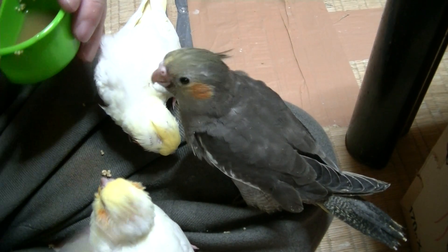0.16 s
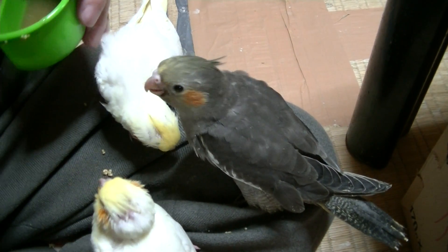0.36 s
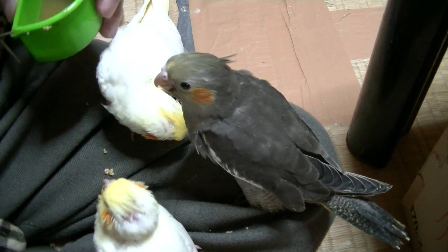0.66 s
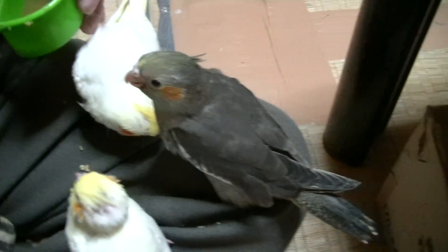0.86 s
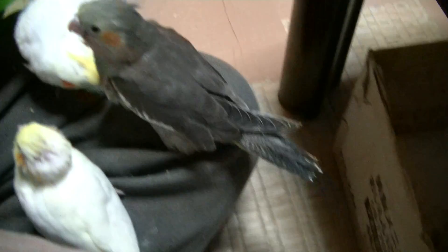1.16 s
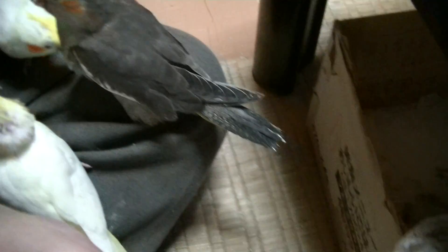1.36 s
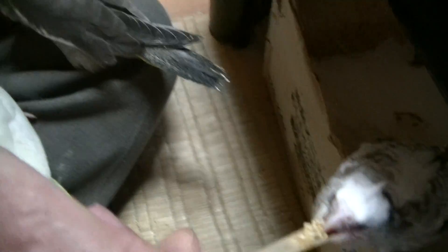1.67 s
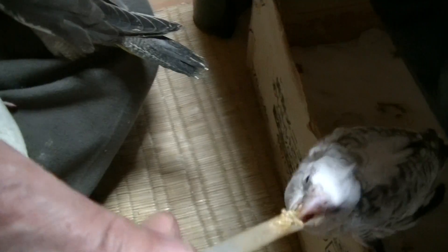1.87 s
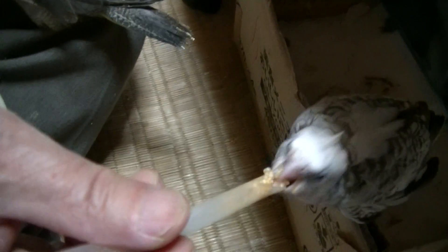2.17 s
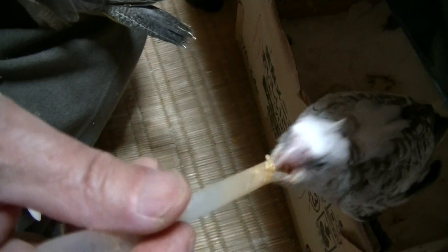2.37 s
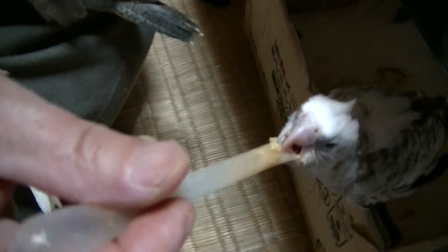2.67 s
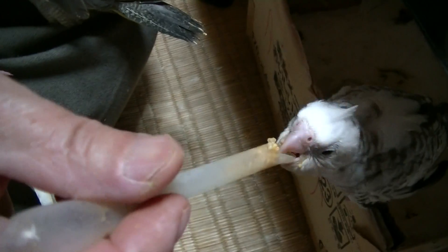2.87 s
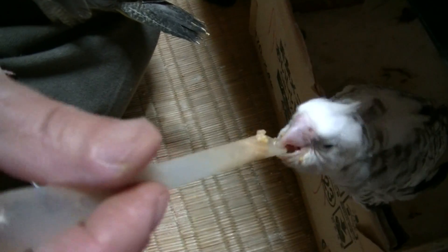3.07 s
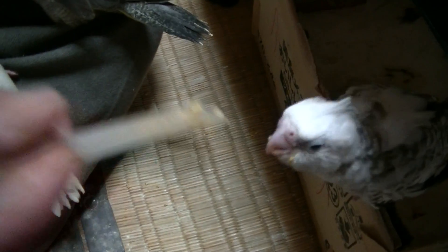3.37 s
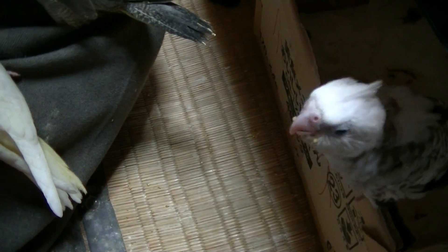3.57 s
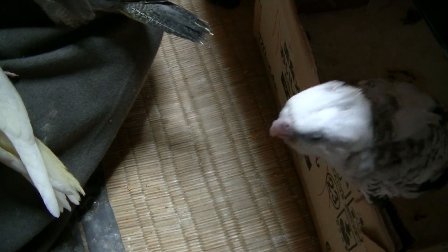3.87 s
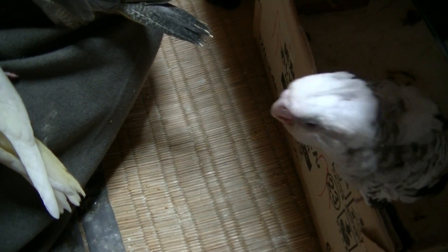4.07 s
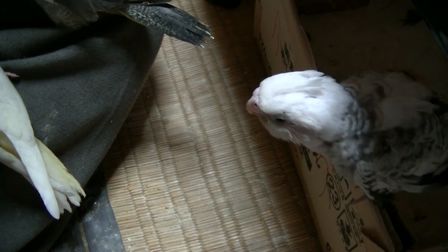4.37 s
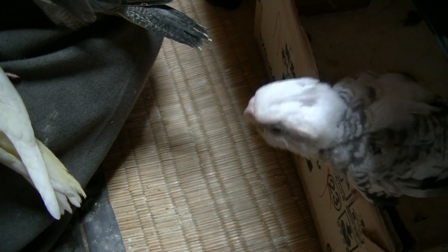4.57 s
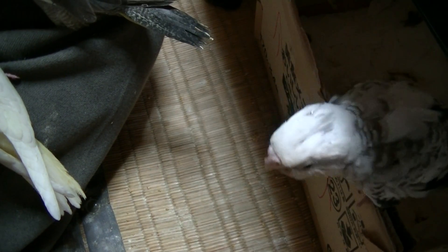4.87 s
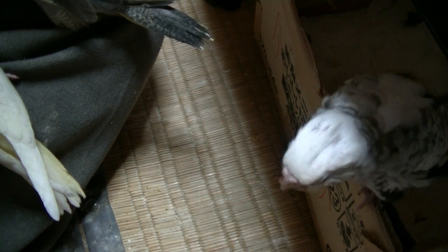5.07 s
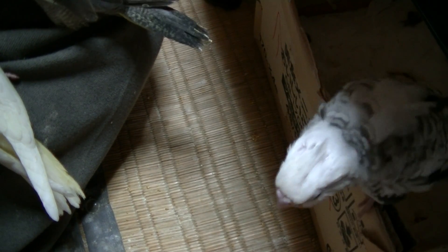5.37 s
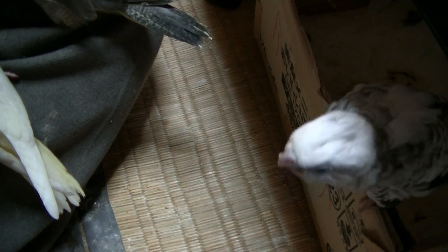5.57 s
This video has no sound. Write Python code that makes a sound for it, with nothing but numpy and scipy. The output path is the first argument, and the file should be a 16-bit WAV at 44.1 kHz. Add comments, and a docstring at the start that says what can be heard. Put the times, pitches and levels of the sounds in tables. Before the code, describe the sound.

Several parrot chicks are heard close up in a small, slightly echoing room with very faint air noise and mains hum. From the start, raspy, breathy hisses overlap with little squeaks and chirps; a long, full, tearing begging call runs from about 0.5 to 1.7 s, its treble shifting as the beak opens. Sharper short hisses follow at 1.8 and 2.0 s among bright chirps. From 2.1 to 4.2 s hissing stops: cardboard bumps sound at about 2.26, 2.5 and 2.8 s, with two fainter knocks near 3.7 and 3.8, tiny squeaks, distant chirps and fine wet crackling. Distinct beak clicks come at 2.9, 3.9 and a close pair at 4.1 s. Thin hisses return at 4.2 s, then a brief hoarse, shrill squeal at 4.57 s that clears as it fades. Softer hisses and small chirps continue to the end, with a barely audible low drone from about 4.6 to 5.8 s.

```python
"""Rasping hisses mixed with chirps and squeaks, a quieter stretch of chirps and clicks, then more hisses:
parrot chicks beg while they are hand-fed in a small room. Hisses are noise through moving throat and beak
resonances; chirps, squeaks and one shrill squeal are unsteady harmonic tones. Beaks click in wet food
(short noisy rings) and a cardboard box is bumped (decaying filtered noise). Under it lie faint coloured
room noise, mains hum and a late low drone."""
import sys
import numpy as np
from scipy import signal
from scipy.fft import rfft, irfft, next_fast_len
from scipy.io import wavfile
from scipy.ndimage import map_coordinates

SR = 44100
rng = np.random.default_rng(int(sys.argv[2]) if len(sys.argv) > 2 else 0)


def persist_wave(psi):
    """Save psi, clipped to +-1, as 16-bit WAV."""
    counts = np.round(np.clip(psi, -1, 1) * 32767).astype(np.int16)
    wavfile.write(sys.argv[1], SR, np.atleast_2d(counts).T)


N = 252693
T = np.arange(N) / SR  # s


def amp(db):
    """Decibels to gain."""
    return 10 ** (np.asarray(db) / 20)


def unit(x):
    """Scale to rms 1."""
    return x / np.sqrt(np.mean(x ** 2) + 1e-20)


def along(points, hz):
    """Read (f/Hz, value) points on a log frequency axis."""
    f, v = np.transpose(points)
    return np.interp(np.log(hz + 1), np.log(f + 1), v)


def curves(rows):
    """One value per sample for each column after the time."""
    t_s, *columns = np.transpose(rows)
    return [np.interp(T, t_s, column) for column in columns]


def gate(rows, fade_s=0.011):
    """Open from the first row's time to the last one's."""
    inside_s = np.minimum(T - rows[0][0], rows[-1][0] - T)
    return np.sqrt(np.clip(inside_s / fade_s + .5, 0, 1))


def wobble(rate_hz, size=N):
    """Smooth random curve with rate_hz knots a second."""
    knots = rng.standard_normal(int(size * rate_hz / SR) + 4)
    return map_coordinates(knots, [np.arange(size) * rate_hz / SR])


def filtered(x, response):
    """Apply a response given as a function of frequency."""
    m = next_fast_len(N + SR // 2)
    return irfft(rfft(x, m) * response(np.fft.rfftfreq(m, 1 / SR)), m)[..., :N]


def humps(modes, hz):
    """Gain of resonances (or notches) on a flat spectrum."""
    gain_db = sum(db / (1 + (2 * (hz - centre) / width) ** 2) for centre, width, db in modes)
    return amp(gain_db)


# left-right likeness at the two ports: f/Hz, likeness (0-1)
PORT_LIKENESS = [(30, .7), (150, .92), (1300, .97), (4000, .89), (9000, .45)]


def ports(pair):
    """Two unrelated signals as heard at close ports: most alike in the low mids, least in the treble."""
    turn_rad = lambda hz: np.arccos(np.clip(along(PORT_LIKENESS, hz), 0, 1)) / 2
    mid, side = filtered(pair, lambda hz: [np.cos(turn_rad(hz)), np.sin(turn_rad(hz))])
    return np.array([mid + side, mid - side])


def noise(colour):
    """Coloured stereo noise of rms 1."""
    return unit(ports(filtered(rng.standard_normal((2, N)), colour)))


def add(track, t_s, sound):
    """Mix a sound into a track at t_s."""
    part = track[max(round(t_s * SR), 0):][:len(sound)]
    part += sound[:len(part)]


# reverberation time of the small room: f/Hz, t60/s
ROOM_T60 = [(3000, 0.33), (12000, 0.092)]


def room(x, walls_db=-16, tail_db=-17):
    """Near surfaces echo within milliseconds, then the small room dies away."""
    hz, t_s, z = signal.stft(rng.standard_normal((2, SR // 3)), SR, nperseg=256)
    decay_db = -60 * t_s / along(ROOM_T60, hz)[:, None]
    tail = signal.istft(z * amp(decay_db), SR, nperseg=256)[1]
    response = amp(tail_db) * tail / np.linalg.norm(tail[0])
    delays = rng.integers(SR // 1000, SR // 120, (2, 8))  # samples, 8 echoes a side
    response[[[0], [1]], delays] += amp(walls_db) / np.sqrt(8)
    wet = signal.fftconvolve(x.mean(axis=0)[None], response, axes=1)[:, :N]
    return x + ports(wet)


# room air spectrum: f/Hz, level/dB
AIR_SPECTRUM = [(30, -27), (70, -16), (130, -6.5), (550, -8.5), (1100, -15), (2500, -17), (7000, -28),
                (15500, -32)]
# low drone: t/s, length/s, rms level/dB
DRONE_SPELLS = [(4.6, 1.25, -67)]
DRONE_HZ = 62.7
HUM_HZ, HUM_RMS_DB = 120.7, -63.5


def background(air_db=-51.5, fade_s=0.2):
    """Still room air as coloured noise; slightly unsteady mains hum and a low drone as sines."""
    air = amp(air_db) * noise(lambda hz: amp(along(AIR_SPECTRUM, hz)))
    hum = amp(HUM_RMS_DB + wobble(1.75)) * np.sin(2 * np.pi * HUM_HZ * T)
    running = sum(amp(db) * gate([[t_s], [t_s + length_s]], fade_s) for t_s, length_s, db in DRONE_SPELLS)
    drone = running * np.sin(2 * np.pi * DRONE_HZ * T)
    return air + np.sqrt(2) * (hum + drone)  # rms to peak


# bumps on the box: t/s, level/dB, low limit f/Hz, high limit f/Hz, t60/s
BUMPS = [(2.262, -14, 322, 1120, 0.22), (2.506, -16, 223, 3060, 0.21), (2.775, -17.5, 181, 348, 0.17),
         (3.704, -31.5, 300, 3230, 0.16), (3.816, -28, 860, 5950, 0.023)]
# cardboard modes: f/Hz, width/Hz, level/dB
BOX_MODES = [(150, 37, 22), (223, 19.5, 15.5), (357, 60, 9), (562, 120, 8)]


def bumps(attack_s=0.0032):
    """Dense cardboard modes die fast; each bump has its own limits, from dull thump to bright knock."""
    out = np.zeros((2, N))
    cardboard = lambda hz: humps(BOX_MODES, hz) / (1 + (hz / 8000) ** 4)
    for t_s, db, low_hz, high_hz, t60_s in BUMPS:
        highpass = lambda hz: (hz / low_hz) ** 6 / (1 + (hz / low_hz) ** 6)
        contact = lambda hz: highpass(hz) / np.sqrt(1 + (hz / high_hz) ** 4)
        age_s = np.maximum(T - t_s, 0)
        envelope = amp(db - 60 * age_s / t60_s) * (1 - np.exp(-age_s / attack_s))
        out += envelope * noise(lambda hz: contact(hz) * cardboard(hz))
    return out


# wet crackle of beaks in food, before random spread: t/s, level/dB
CRACKLE = [(2.1, -46.5), (3.6, -60.5), (4.05, -46), (5.7, -51.5)]
# distinct beak clicks: t/s, level/dB
CLICKS = [(2.875, -34.5), (3.887, -40), (4.087, -32), (4.107, -33)]


def nibbles(rate_hz=150, spread_db=4.0):
    """Beaks smack in soft food: distinct clicks over a fine crackle, each a noisy ring at its own pitch."""
    out = np.zeros(N)
    ring_s = np.arange(SR // 200) / SR
    start_s, end_s = CRACKLE[0][0], CRACKLE[-1][0]
    when, size = rng.random((int(rate_hz * (end_s - start_s)), 2)).T
    times_s = start_s + when * (end_s - start_s)
    levels_db = np.interp(times_s, *np.transpose(CRACKLE)) - spread_db * np.log(size + 0.28)
    for t_s, db in CLICKS + list(zip(times_s, levels_db)):
        pitch_hz = 1700 * 5 ** rng.random()
        ring = np.sin(2 * np.pi * pitch_hz * ring_s) + rng.standard_normal(len(ring_s))
        add(out, t_s, amp(db - 60 * ring_s / 0.02) * ring)
    return filtered(out, lambda hz: 1 / (1 + 1j * hz / 7000))


def whistle(pitch_hz, rough, partials):
    """A syrinx tone; roughness shakes its pitch and its size."""
    size = len(pitch_hz)
    shaken_hz = pitch_hz * (1 + 0.0783 * rough * wobble(1300, size))
    phase = 2 * np.pi * np.cumsum(shaken_hz) / SR
    tone = sum(amp(db) * np.sin(k * phase) for k, db in partials)
    return unit(tone * amp(2.0 * rough * wobble(570, size)))


def overtones(db, pure_db=1.9):
    """(multiple, dB) of a whistle: the louder, the purer."""
    drop_db = 11.0 + pure_db * max(db + 36.0, 0)
    return [(k, (1 - k) * drop_db) for k in range(1, 4)]


# tiny squeaks between gulps: t/s, peak level/dB, f/Hz
SQUEAKS = [(0.164, -11.5, 1950), (0.329, -15.5, 1890), (1.753, -21.5, 2800), (2.2313, -28, 3380),
           (2.391, -27, 3650), (2.8493, -31, 3380), (2.984, -26.5, 3430), (3.0003, -26.5, 3500),
           (3.08, -34, 2940), (3.099, -30.5, 3430), (3.2397, -25.5, 3590), (3.361, -31, 3220),
           (3.3862, -32, 3110), (3.536, -29, 3100), (5.092, -19.5, 2420), (5.223, -26, 1680),
           (5.4273, -27.5, 1820), (5.538, -27.5, 1760)]


def squeaks():
    """Rising whistles that last only a few milliseconds."""
    out = np.zeros(N)
    u = np.linspace(-1, 1, SR // 210)
    for t_s, peak_db, hz in SQUEAKS:
        tone = whistle(hz * (1 + 0.12 * u), 0.6, overtones(peak_db - 19))
        add(out, t_s, amp(peak_db - 4.5) * (1 - u * u) ** 2 * tone)  # rms-1 tone peaks higher
    return out


# chirps: t/s, length/s, middle f/Hz, glide/octaves, level/dB, manner
CHIRPS = [(0.277, 0.03, 3920, 0.28, -32, "clear"), (0.554, 0.025, 3020, -0.15, -26.5, "clear"),
          (0.595, 0.0424, 3905, -0.0093, -26, "hoarse"), (0.813, 0.016, 3445, 0.05, -23.5, "far"),
          (1.304, 0.011, 3250, 0.08, -17.5, "clear"), (1.726, 0.013, 4580, 0.24, -20.5, "clear"),
          (1.766, 0.013, 3134, 0.82, -26, "far"), (1.832, 0.0187, 4630, 0.12, -20.5, "clear"),
          (1.935, 0.014, 4240, 0.59, -20.5, "clear"), (1.958, 0.017, 3190, 0.42, -27.5, "far"),
          (2.167, 0.079, 2460, 0.45, -45, "hoarse"), (2.187, 0.0088, 3360, -0.2, -35, "far"),
          (2.244, 0.03, 3730, -0.12, -37, "far"), (2.261, 0.058, 2877, 0.067, -34, "far"),
          (2.546, 0.013, 3400, 0.21, -25, "far"), (3.198, 0.015, 3286, 0.0051, -34, "clear"),
          (3.264, 0.095, 3210, -0.2, -47.5, "hoarse"), (3.549, 0.018, 3540, -0.36, -38, "clear"),
          (4.306, 0.024, 2950, 0.52, -30, "far"), (4.588, 0.051, 3230, 0.57, -32, "hoarse"),
          (5.073, 0.025, 3930, -0.13, -37.5, "clear"), (5.121, 0.025, 3970, -0.6, -35.5, "clear"),
          (5.297, 0.021, 3870, 0.34, -31.5, "clear"), (5.343, 0.05, 3940, 0.1, -39.5, "clear"),
          (5.424, 0.022, 2830, 1, -39.5, "far")]
# break-up of each manner of chirp: manner -> roughness (1)
ROUGHNESS = {"clear": 0.21, "far": 0.47, "hoarse": 1.14}
ARCH_OCTAVES = 0.136  # least drop of both ends below the straight glide


def chirps(manner, lean=0.297):
    """Quick arched whistles of one manner; the pitch moves fastest as the syrinx opens and shuts."""
    out = np.zeros(N)
    for t_s, length_s, hz, glide_oct, db in [row[:-1] for row in CHIRPS if row[-1] == manner]:
        u = np.linspace(-1, 1, round(length_s * SR))
        bend = u * (1 + np.abs(u)) / 2
        drop_oct = ARCH_OCTAVES + lean * abs(glide_oct)  # wide glides arch more
        pitch_hz = hz * 2 ** (glide_oct * bend / 2 - drop_oct * bend ** 2)
        swell = unit(1 + u * u) * signal.windows.tukey(len(u), .2)  # both ends pop
        add(out, t_s, amp(db) * swell * whistle(pitch_hz, ROUGHNESS[manner], overtones(db)))
    return out


# squeal: t/s, level/dB, pitch f/Hz
SQUEAL = [(4.566, -31, 1220), (4.6, -23, 1189), (4.65, -30, 1173), (4.76, -53.5, 1165)]
# squeal partials from the second upward: level/dB
SQUEAL_PARTIALS = [0.5, 1.5, 8, -2, 2, -12, -4, -10, -10.5]


def squeal(rough=0.503, clears_s=0.14):
    """One nearly level-pitched cry that starts hoarse and clears as it trails off."""
    db, pitch_hz = curves(SQUEAL)
    hoarse = rough * np.exp(-np.maximum(T - SQUEAL[0][0], 0) / clears_s)
    return gate(SQUEAL) * amp(db) * whistle(pitch_hz, hoarse, enumerate(SQUEAL_PARTIALS, 2))


# bare breath spectrum: f/Hz, level/dB
BREATH_SPECTRUM = [(100, -75), (650, -11.5), (1000, -12.5), (1400, -3), (2700, -5), (6200, -7.5),
                   (10000, -15.5), (15500, -32.5)]
TENSION_OCTAVES = 0.04  # the throat tightens and slackens over each hiss


def voiced(calls, throat):
    """Air through resonances that rise and fall with each call, or glide along a curve."""
    air = noise(lambda hz: amp(along(BREATH_SPECTRUM, hz)))
    hz, t_s, z = signal.stft(air, SR, nperseg=512)
    arch = sum(np.sin(np.interp(t_s, [rows[0][0], rows[-1][0]], [0, np.pi])) for rows in calls)
    stretch = 2 ** (TENSION_OCTAVES * (np.minimum(arch, 1) - np.pi / 4))

    def place_hz(centre):
        """A glide read over time, or a fixed centre moved by throat tension."""
        return np.interp(t_s, *np.transpose(centre)) if np.ndim(centre) else centre * stretch

    moving = [(place_hz(centre), width, db) for centre, width, db in throat]
    return signal.istft(z * humps(moving, hz[:, None]), nperseg=512)[1][:, :N]


def drifting(x, depth_db=3.0, above_hz=2200, spacing_hz=170, rate_hz=4, sway=0.015):
    """As the head turns, peaks and notches in the treble slide, come and go."""
    hz, t_s, z = signal.stft(x, SR, nperseg=512)
    turn = 1 + sway * np.interp(t_s, T, wobble(rate_hz))
    place = np.broadcast_arrays(hz[:, None] * turn / spacing_hz, t_s * rate_hz)
    field = map_coordinates(rng.standard_normal((128, 64)), place, mode="mirror")
    ripple_db = depth_db * field * np.minimum(hz / above_hz, 1)[:, None] ** 2
    return signal.istft(z * amp(ripple_db), nperseg=512)[1][:, :N]


SPUTTER_DB, SPUTTER_S = 4.5, 0.039  # a hiss sputters as it starts, then the flow settles


def hiss(calls, bright_db, throat, rasp_db=1.3):
    """Air tears through the throat; a wider beak lets out more of the upper registers."""
    air = drifting(voiced(calls, throat))
    below = lambda edge_hz: filtered(air, lambda hz: 1 / (1 + (hz / edge_hz) ** 10))
    low, body = below(2600), below(7800)
    low, middle, top = unit(low), unit(body - low), unit(air - body)
    out = np.zeros((2, N))
    catch = np.tanh(2 * wobble(330)) - .5
    for rows in calls:
        sputter_db = SPUTTER_DB * catch * np.exp(-np.abs(T - rows[0][0]) / SPUTTER_S)
        effort_db, gape_db = curves(rows)
        registers = low + amp(bright_db + 0.31 * gape_db) * middle + amp(gape_db) * top
        out += gate(rows) * amp(effort_db + sputter_db) * registers
    return out * amp(rasp_db * wobble(900))  # the membranes flap unevenly


EDGE_DB, EDGE_GAPE_DB = -10, -1  # weaker effort, narrower beak at both ends of a hiss
GAPE_DB_PER_S = 21.5  # steady opening of the beak


def breath(t_s, attack_s, hold_s, release_s, effort_db, gape_db):
    """A short hiss swells, holds and fades as the beak opens: rows of t/s, effort/dB, gape/dB."""
    age_s = np.cumsum(np.abs([0, attack_s, hold_s, release_s]))
    edge = np.array([1, 0, 0, 1])
    efforts_db = effort_db + EDGE_DB * edge
    gapes_db = gape_db + EDGE_GAPE_DB * edge + GAPE_DB_PER_S * age_s
    return np.transpose([t_s + age_s, efforts_db, gapes_db])


# drawn-out begging call: t/s, effort level/dB, gape (treble over throat)/dB
LONG_BEG = [(0.53, -33, -8), (0.59, -32.5, -13.5), (0.876, -31, -6), (1.17, -31.5, -14),
            (1.494, -32.5, -12), (1.66, -32.5, -2.5), (1.71, -34.5, -16), (1.728, -45, 9.5)]
# short hisses: t/s, attack/s, hold/s, release/s, effort level/dB, gape/dB, voice
HISSES = [(-0.01, 0.0077, .16, 0.023, -33, -15, "soft"), (0.179, 0.079, 0.32, 0.019, -34, -19.5, "soft"),
          (0.283, 0.027, 0.016, 0.012, -36, -11.5, "soft"), (1.032, 0.016, 0.023, .03, -39, 0.5, "sharp"),
          (1.401, 0.018, 0.023, 0.032, -38.5, 4, "sharp"),
          (1.814, 0.056, 0.051, 0.073, -34.5, 0.5, "sharp"),
          (2.003, 0.028, 0.031, 0.051, -36, -5.5, "sharp"), (4.216, 0.027, .15, 0.059, -39.5, -18, "thin"),
          (4.444, 0.034, 0.042, 0.037, -39.5, -14.5, "thin"),
          (4.542, 0.033, 0.014, 0.041, -35.5, -25, "thin"),
          (4.798, 0.0097, 0.053, 0.0081, -38, -13, "soft"),
          (4.863, 0.0058, 0.21, 0.07, -39, -17.5, "plain"), (5.229, 0.033, 0.016, 0.05, -34, -16, "plain"),
          (5.32, 0.0077, 0.059, 0.011, -46.5, -13, "plain"), (5.557, 0.032, 0.12, 0.04, -35, -12, "plain")]
# beak resonance of the long call: t/s, f/Hz
BEAK_GLIDE = [(0.75, 6440), (0.98, 6170), (1.12, 5300), (1.4, 5650)]
# notch above it, which jumps as the beak opens: t/s, f/Hz
NOTCH_GLIDE = [(0.65, 7260), (0.72, 9600)]
# voice -> brightness/dB, resonances and notches (f/Hz or glide, width/Hz, level/dB)
VOICES = {"soft": (4.85, [(1680, 1730, 10.5), (4180, 880, 8), (5650, 600, 4)]),
          "full": (7.95, [(1320, 680, 5.4), (2620, 180, -9), (3570, 200, -7.5), (4450, 6900, 16.7),
          (BEAK_GLIDE, 590, 4.8), (NOTCH_GLIDE, 2500, -12.5)]), "sharp": (13.1, [(1950, 470, 11),
          (3230, 150, 11), (6480, 2000, 8), (9630, 1900, 8)]), "thin": (8.6, [(3715, 530, 16.5),
          (7400, 620, 11.5)]), "plain": (2.8, [(3044, 120, 11.5), (10550, 870, 6)])}


def begging():
    """The drawn-out call and the short hisses, each through its own voice's resonances."""
    calls = [(LONG_BEG, "full")]
    calls += [(breath(*shape), voice) for *shape, voice in HISSES]
    out = np.zeros((2, N))
    for name, (bright_db, throat) in VOICES.items():
        out += hiss([rows for rows, voice in calls if voice == name], bright_db, throat)
    return out


def scene():
    """Chicks and box sound close; some chirps come from further off and ring in the room."""
    to_right = amp([[-1.8], [0]])  # left, right
    close = bumps() + nibbles() + squeaks() + chirps("clear") + chirps("hoarse") + begging()
    near = room(close + squeal() * to_right)
    far = room(chirps("far") * to_right, walls_db=-2, tail_db=-4.5)
    return background() + far + near


LAG_S = 1e-5  # the right port leads
TOP_HZ = 15850


def record(dry):
    """One port lies slightly nearer, so its phase leads; nothing passes above the band limit."""
    side = np.array([[-1], [1]])
    return filtered(dry, lambda hz: (hz < TOP_HZ) * np.exp(1j * np.pi * LAG_S * hz * side))


dry = scene()
out = record(dry)
persist_wave(out)
```